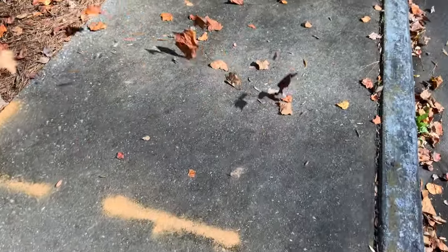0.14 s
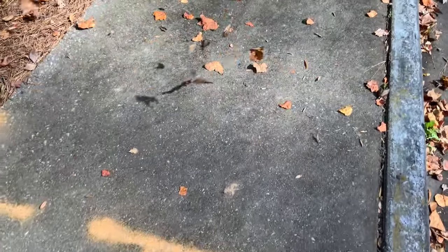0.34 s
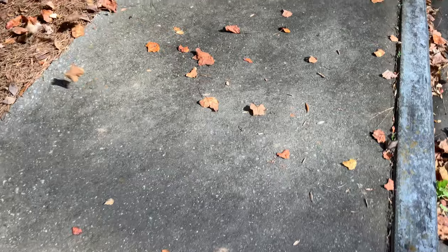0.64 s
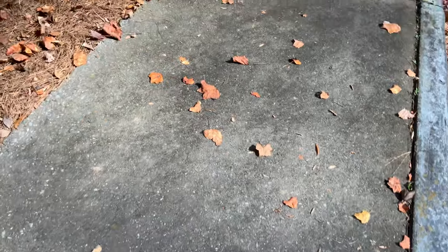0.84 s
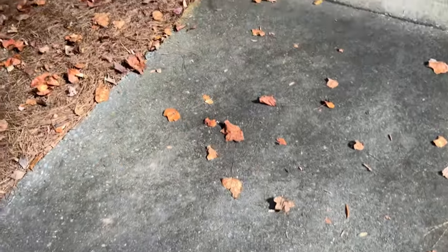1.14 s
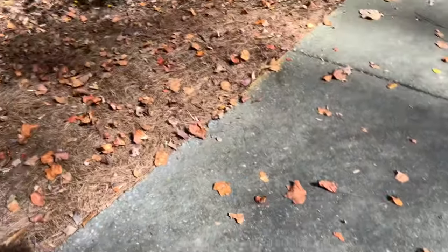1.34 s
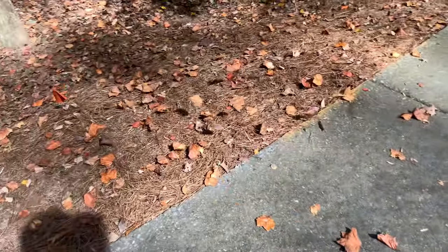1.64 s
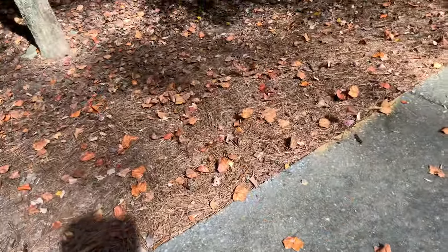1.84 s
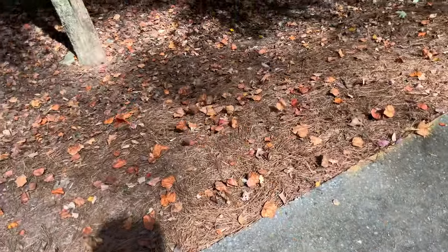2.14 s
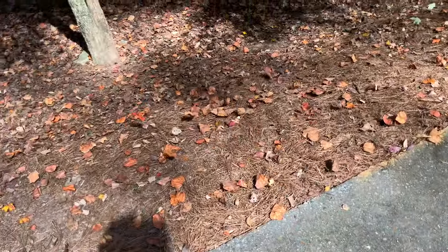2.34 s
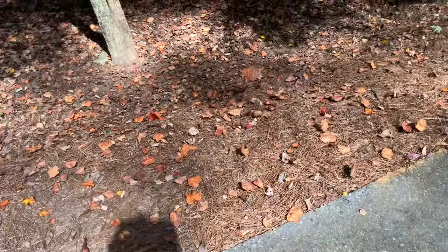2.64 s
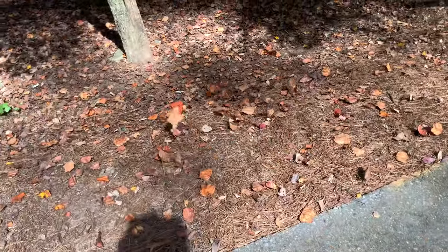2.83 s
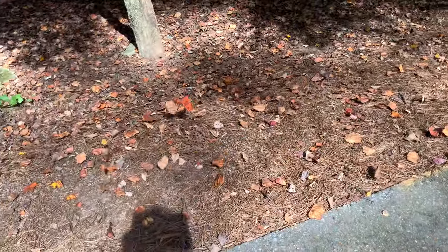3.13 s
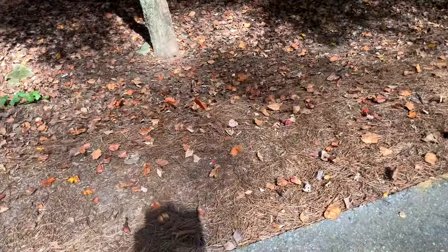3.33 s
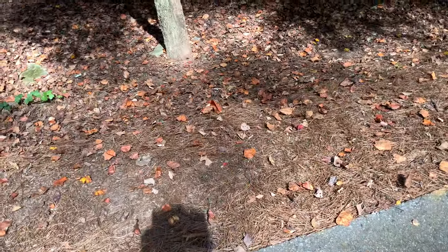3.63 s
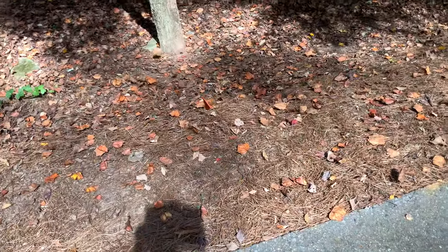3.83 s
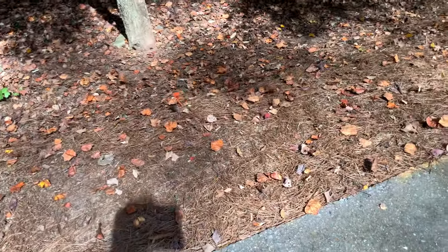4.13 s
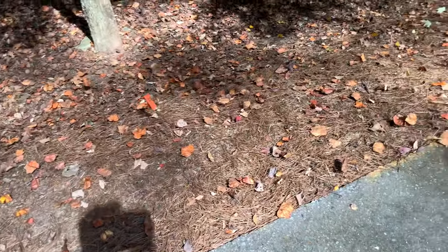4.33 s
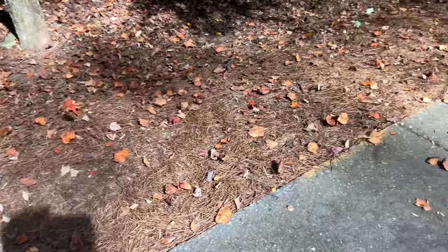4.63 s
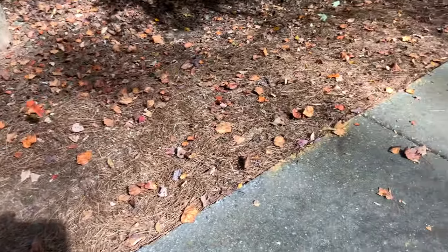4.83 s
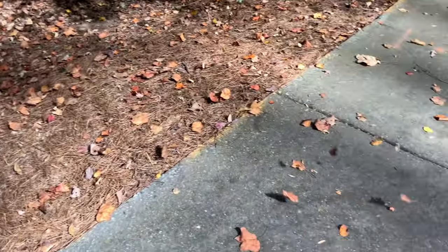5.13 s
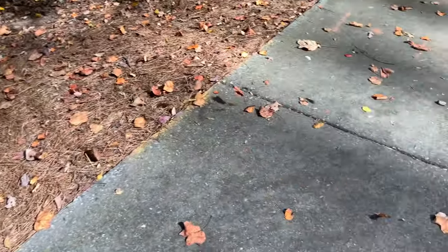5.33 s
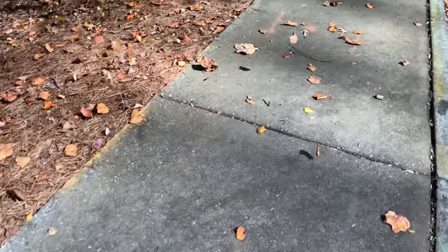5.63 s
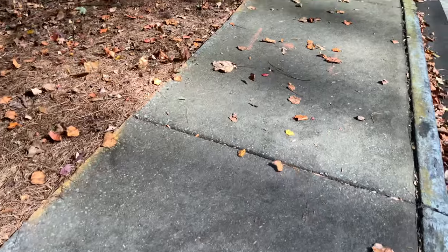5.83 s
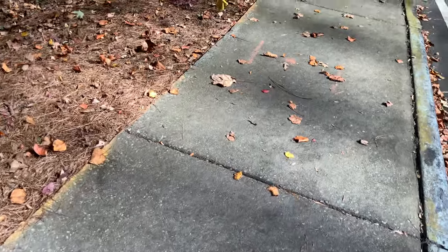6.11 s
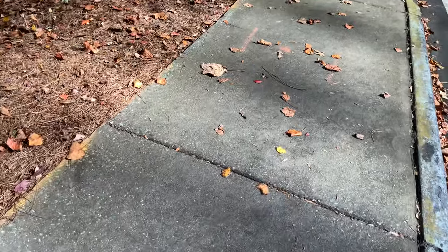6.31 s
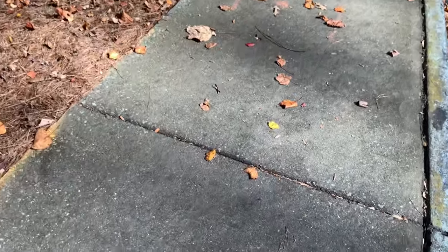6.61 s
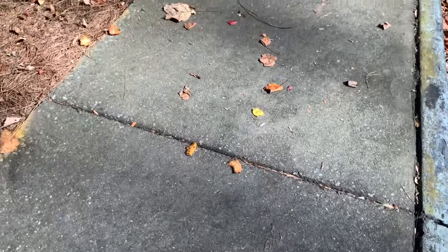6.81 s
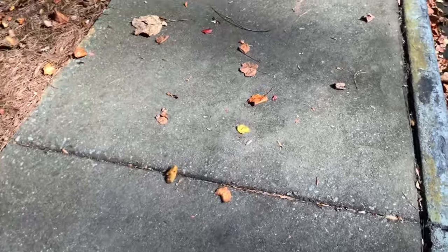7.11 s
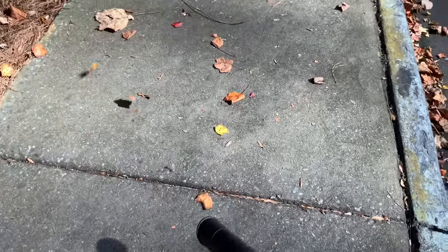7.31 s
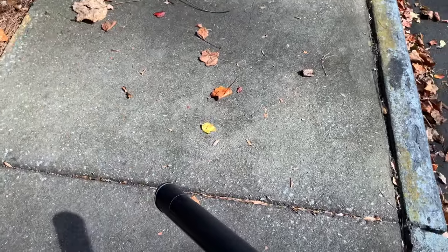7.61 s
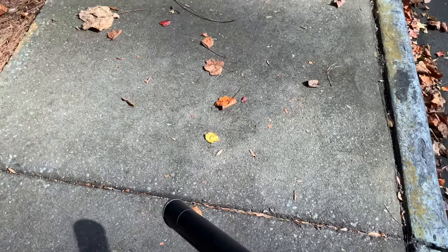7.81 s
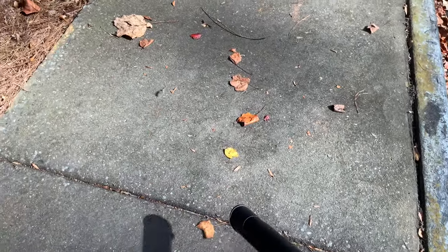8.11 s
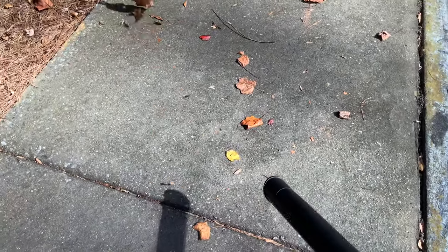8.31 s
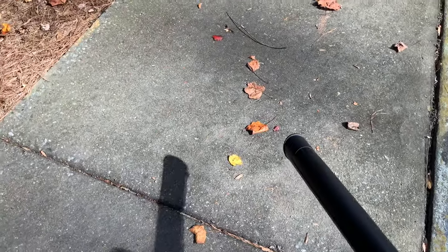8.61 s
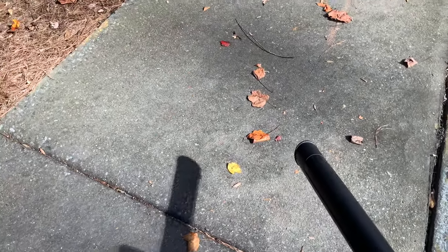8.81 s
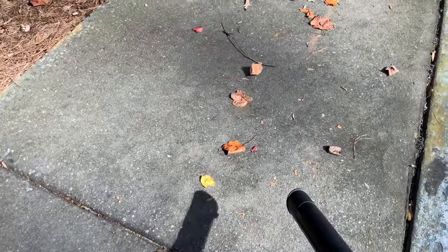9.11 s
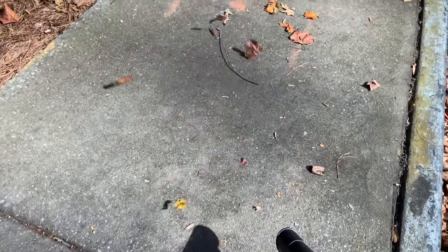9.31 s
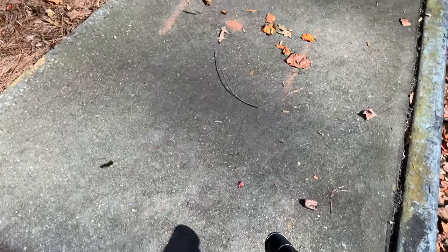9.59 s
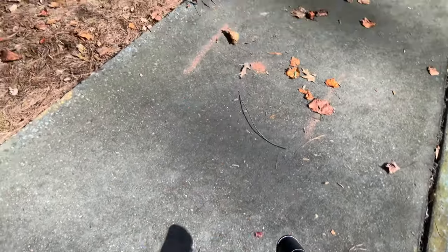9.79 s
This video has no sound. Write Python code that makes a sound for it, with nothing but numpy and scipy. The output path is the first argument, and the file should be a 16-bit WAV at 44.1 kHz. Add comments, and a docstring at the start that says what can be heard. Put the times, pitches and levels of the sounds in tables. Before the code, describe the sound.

Close outdoors, a cordless leaf blower runs at constant full power. A steady electric fan whine, with a low hum and piercing higher tones, sits in a broad rush of air. The sound dulls when the sweep turns aside over pine straw, then brightens as the nozzle pushes forward over pavement. Wind buffets the stereo microphone, hardest near the early turn, and a few leaves and grit tick faintly.

```python
"""Leaf blower swept over a pavement

A cordless blower runs at full power a little way from a two-port microphone. Its nine-blade fan whines on
multiples of the shaft speed; the partials swell and fade as the sweep changes their paths. Air rushes as
noise coloured by intake and tube, gusts buffet the ports, and a few dry leaves tick among grit on concrete."""
import sys
import numpy as np
from scipy import signal
from scipy.fft import rfft, irfft, next_fast_len
from scipy.io import wavfile
from scipy.ndimage import uniform_filter1d

SR = 44100
rng = np.random.default_rng(int(sys.argv[2]) if len(sys.argv) > 2 else 0)


def wav_record(signal):
    """Record a signal, one row per channel, as 16-bit PCM in the file named by sys.argv[1]."""
    frames = np.transpose(np.atleast_2d(signal))
    bounded = np.clip(frames, -1, 1)
    # unit amplitude maps onto the largest positive 16-bit level
    quanta = np.round(bounded * 32767).astype(np.int16)
    wavfile.write(sys.argv[1], SR, quanta)


N = 438794
TIME = np.arange(N) / SR

# Low partials of the fan. Each row: multiple of the shaft speed, level in dB before its swell,
# left-right balance in dB, phase lead of the left port in radians.
PARTIALS = [(1, -31.5, 3.5, -0.51), (2, -47, -4.3, -0.7), (3, -34, 2.5, -2.5), (4, -33.5, 9.5, -2),
            (5, -30, 4.5, 0.02), (6, -27.5, 9.3, 2.5), (7, -36.5, 4.5, 2.5), (8, -41.5, -16, 0),
            (9, -25, 2, -1.1), (10, -41.5, -.7, -0.84), (11, -37, -1.5, -1.5), (12, -38.5, -1, -1.5),
            (13, -40, 4, -3), (14, -37, -2.8, 1.5), (15, -44.5, 8, 0.95), (16, -33.5, 5, -1),
            (17, -35.5, 4, -1.5), (18, -32, 3, -1.5), (19, -39.5, 1, -1.6)]
# The sweep turns aside and back. Each row: time in seconds, 0 along the pavement to 1 over the pine straw.
ASIDE = [(1.15, 0), (1.7, 1), (4.4, 1), (6.1, 0)]
# The blower is pushed forward. Each row: time in seconds, 0 held back to 1 with the nozzle out in front.
FORWARD = [(6.9, 0), (7.7, 1)]
# Treble shared by the top of the buzz and, in part, the rush. Each row: time in seconds, swell in dB.
TREBLE_LEVEL = [(0.0, -1.2), (1.3, -4.3), (1.4, -12), (1.6, -7.5), (2.2, -7.5), (3.9, -4.5), (4.0, -7.5),
                (5.0, -4.5), (5.8, -6.5), (6.5, -6), (7.1, 1.5), (9.95, 1.5)]
# Swells of the shaft hum, three more partials and the blade tone. Each row: time in seconds, swell in dB.
HUM = [(0, -1.5), (1.05, 1), (2, -4.5), (3.2, 1), (4.15, 4), (4.8, -12), (5.55, 2), (6.6, 1.5), (7.8, 6),
       (8.3, 3.5), (8.9, 5.5), (9.3, 3), (9.95, 3.5)]
THIRD = [(0.0, -12), (0.7, -5), (1.0, -17), (2.3, -34), (2.7, 1), (3.8, -13), (4.2, 4.5), (4.7, -7),
         (4.8, -18), (5.4, -10), (5.7, -1), (6.8, -14), (6.9, -2.5), (7.4, -4), (7.8, 2.5), (9.95, 9.5)]
FOURTH = [(0.0, 3.5), (0.7, 3.5), (3.2, -3.5), (3.7, -0.5), (4.1, -7), (4.2, -20), (5.1, -0.5), (5.7, -9.5),
          (6.6, 4), (8.6, 0.3), (8.8, -13), (9.1, 8), (9.95, -8)]
FIFTH = [(0.0, -9.5), (1.2, -7), (1.5, -19), (3.1, 6), (3.5, -8.5), (3.9, -6.5), (4.1, 3), (4.9, -6.5),
         (5.2, 0.7), (5.8, 4), (6.7, -2.7), (7.3, -13.5), (7.5, 0), (8.1, 5), (8.5, -1.5), (9.4, 5),
         (9.7, -4.5), (9.95, 5)]
BLADE_TONE = [(0.0, -9), (0.4, 2), (1.8, -19), (2.0, -6.5), (2.2, -20.5), (3.1, -14.5), (3.3, -14),
              (4.1, -13.5), (5.0, -6.5), (5.1, -17), (5.4, -6), (6.2, -8), (6.7, -5.5), (6.8, 3.8),
              (7.6, 5), (7.8, -2.5), (8.7, 8.5), (9.95, 3.5)]
# the strong tones, by multiple of the shaft speed
LEAD_TONES = {1: HUM, 3: THIRD, 4: FOURTH, 5: FIFTH, 9: BLADE_TONE}


def gain_of(db):
    """Decibels to amplitude."""
    return 10 ** (np.asarray(db) / 20)


def evened(x):
    """Scales to an rms of 1."""
    return x / np.sqrt(np.mean(abs(x) ** 2) + 1e-20)


def read(points, hz):
    """Every column of a table at hz, interpolated on a log axis."""
    f, *columns = np.transpose(points)
    return [np.interp(np.log(hz + 1), np.log(f + 1), c) for c in columns]


def follow(rows, t):
    """Every column of a curve at the times t."""
    s, *columns = np.transpose(rows)
    return [np.interp(t, s, c) for c in columns]


def add(mix, s, sound):
    """Lays a stereo sound into the mix at time s."""
    part = mix[:, round(s * SR):][:, :sound.shape[1]]
    part += sound[:, :part.shape[1]]


def drift(t, rate_hz):
    """Complex chance of rms 1 on the even grid t, changing at up to about rate_hz."""
    f = np.fft.fftfreq(len(t), t[1] - t[0])
    a, b = rng.standard_normal((2, len(t)))
    smooth = np.exp(-.5 * (f / rate_hz) ** 2)
    return evened(np.fft.ifft((a + 1j * b) * smooth))


def noise_pair(spectrum, likeness):
    """Two partly alike noises, with a joint rms of 1 and a given spectrum."""
    left, other = rng.standard_normal((2, N))
    right = likeness * left + np.sqrt(1 - likeness ** 2) * other
    size = next_fast_len(N, True)
    gains = gain_of(read(spectrum, np.fft.rfftfreq(size, 1 / SR))[0])
    shaped = irfft(rfft(np.array([left, right]), size) * gains, size)
    return evened(shaped[:, :N])


def ports(hz):
    """Balance, likeness and phase lead of the left port for sound from the blower."""
    # Each row: frequency in Hz, left-right balance in dB, likeness 0-1, left lead in radians before the lag.
    port_rows = [(200, 1, .6, 1), (480, -1.5, .8, -.1), (650, 0, .8, .4), (830, 3.5, .6, .7),
                 (1000, 3, .3, -1.7), (1300, 4, .35, -1), (1550, 2, .55, 2.3), (2100, 0, .65, 1.1),
                 (2900, 0, .4, 2), (3700, 1.7, .5, .8), (4600, .5, .45, 2.6), (6300, .6, .8, .3),
                 (8400, 1.8, .4, 0), (10000, 0, .8, .1), (15500, 0, .8, -1)]
    lag = 0.0006144  # seconds by which the left port hears the blower later
    balance_db, likeness, lead = read(port_rows, hz)
    return balance_db, likeness, lead - 2 * np.pi * hz * lag


def split(balance_db):
    """Left and right gains that keep the mean power."""
    pair = np.array([gain_of(balance_db / 2), gain_of(-balance_db / 2)])
    return pair / np.sqrt(np.mean(pair ** 2, axis=0))


def swell(k, hz, t):
    """Level change in dB of multiple k as the blower is swept about."""
    # Buzz, the multiples above the low partials. Each row: time in seconds, swell in dB.
    buzz_level = [(0.0, 1), (0.2, -5), (0.5, -0.5), (2.8, -2), (3.3, 1), (3.9, 2.5), (4.5, -4), (4.9, 3.5),
                  (5.0, -2.5), (5.5, 0.6), (6.2, 2.5), (6.4, -1), (6.6, 3), (7.1, -3.5), (8.7, 0.5),
                  (9.95, 0.4)]
    # Low partials that follow the blower's pose. Each row: multiple, dB when turned aside,
    # dB when pushed forward, dB per dB of the buzz swell.
    beaming = [(2, 4.5, -0.5, 0.84), (6, -4.5, -2.5, .1), (7, -0.5, 5, 0.4), (8, -9, 4, 0.6),
               (10, -6.5, 11.5, -1.7), (11, 3.5, 2, -0.1), (12, -0.5, -6, 0.3), (13, 1, 4, -0.6),
               (14, 1.5, 1.5, -0.5), (15, 4.5, 12.5, 0.8), (16, -18, -3.5, 0.2), (17, -19, -8, 0.5),
               (18, -2, 2, 1.34), (19, -4.5, 5, 1.2)]
    # Upper whine, just above the blade tone. Each row: time in seconds, swell in dB.
    upper_whine = [(0, -1.5), (.7, 2.5), (1.5, -4), (2.3, -1.5), (2.9, -6.5), (3.2, 3.5), (3.5, -3),
                   (3.85, 6.5), (4.2, 1), (4.9, -8), (5.6, -4), (6.8, 2.5), (7.2, -.5), (7.55, 6),
                   (8.1, -0.5), (9.2, 3.5), (9.95, -4.5)]
    # The multiples of the shaft speed that make up the upper whine.
    upper_multiples = [11, 12, 13, 14]
    treble_hz = 9600  # the buzz follows the treble from here up

    if k in LEAD_TONES:
        return follow(LEAD_TONES[k], t)[0]
    if k > len(PARTIALS):
        return follow(buzz_level if hz < treble_hz else TREBLE_LEVEL, t)[0]
    aside, forward, buzz_db = (follow(curve, t)[0] for curve in (ASIDE, FORWARD, buzz_level))
    aside_db, forward_db, per_buzz = read(beaming, k)
    upper_db = (k in upper_multiples) * follow(upper_whine, t)[0]
    return aside_db * aside + forward_db * forward + per_buzz * buzz_db + upper_db


def whine():
    """Shaft harmonics; each arrives directly and by shifting reflections, and flutters in the turbulent intake."""
    # Shaft speed before jitter. Each row: time in seconds, turns per second.
    shaft_speed = [(0, 232.1), (1.1, 231.9), (2.1, 232.35), (2.8, 231.65), (3.3, 231.95), (4.1, 231.3),
                   (5.1, 231.95), (5.6, 231.65), (7.5, 231.9), (7.8, 231.5), (8.1, 231.95), (9, 231.55),
                   (9.95, 230.8)]
    # Buzz above the low partials. Each row: frequency in Hz, level of each partial in dB before its swell.
    buzz = [(4600, -41), (5200, -44), (5560, -38), (5900, -44), (6300, -41), (7000, -41), (7300, -47),
            (8200, -43), (9700, -46), (12000, -46.5), (13000, -45), (15500, -48)]
    # Partials whose balance shifts as the blower is pushed forward and whose direction wanders.
    # Each entry: multiple, change of left-right balance in dB.
    leaning = {4: -11.8, 5: -4.1, 6: -6.5}
    # The hum's direction swings with the sweep. Each row: time in seconds, extra left lead in radians.
    hum_lead = [(0, -0.12), (1.2, -0.13), (2.2, -0.52), (4.3, -1.9), (6.7, -1.9), (7.9, -0.27)]
    jitter, jitter_hz = 0.000397, 14  # share of the shaft speed
    # the strong tones are nearly pure: their scatter; also the flutter up to and including the blade tone
    steady = .06
    scatter, low_scatter = 0.96, 0.82  # share reflected: buzz, other low partials
    fade_hz, low_fade_hz = 0.41, 0.56  # before the rise with the multiple
    kinship = 0.41  # likeness of neighbouring partials' echoes
    flutter, flutter_hz = 0.36, 22
    wander_rad, wander_hz = 1.0, 0.24

    t = np.arange(0, N / SR + .01, .004)
    speed, forward = follow(shaft_speed, t)[0], follow(FORWARD, t)[0]
    jittered = np.interp(TIME, t, speed * (1 + jitter * drift(t, jitter_hz).real))
    turn = np.exp(2j * np.pi * np.cumsum(jittered) / SR)
    # neighbouring partials keep a loose step, so each turn of the shaft is one smeared pulse
    phases = np.cumsum(rng.standard_normal(size=68))
    wave, out, echoes = np.ones(N, complex), np.zeros((2, N)), 0
    for k, phase in enumerate(phases, 1):
        wave *= turn
        hz, low, strong = k * speed.mean(), k <= len(PARTIALS), k in LEAD_TONES
        balance_db, likeness, lead = ports(hz)
        db = read(buzz, hz)[0]
        if low:
            _, db, balance_db, lead = PARTIALS[k - 1]

        # long waves pass steadily; short ones are scattered and disturbed
        shortness = min(1, k / 10)
        share = shortness * (steady if strong else low_scatter if low else scatter)
        tremble = np.sqrt(shortness) * (steady if k < 10 else flutter)

        # neighbours fade together, and faster the shorter their waves
        rate_hz = (low_fade_hz if low else fade_hz) * np.sqrt(k)
        fresh = np.array([drift(t, rate_hz) for _ in range(3)])
        echoes = kinship * echoes + np.sqrt(1 - kinship ** 2) * fresh
        # one echo common to both ports, one of each port's own
        reflected = np.sqrt(likeness) * echoes[0] + np.sqrt(1 - likeness) * echoes[1:]
        path = evened(np.sqrt(1 - share ** 2) + share * reflected + tremble * drift(t, flutter_hz))

        path *= gain_of(db + swell(k, hz, t))
        path *= split(balance_db + leaning.get(k, 0) * forward) * np.exp(1j * phase)
        if k == 1:
            lead = lead + follow(hum_lead, t)[0]
        if k in leaning:
            lead = lead + wander_rad * drift(t, wander_hz).real
        path[0] *= np.exp(1j * lead)
        for port in range(2):
            out[port] += (np.interp(TIME, t, path[port]) * wave).real
    return np.sqrt(2) * out


def aim(t, hz):
    """Level change in dB of the rush, times by frequencies, as the blower turns and reaches out."""
    # Each row: frequency in Hz, constant change in dB, dB when turned aside, dB when pushed forward,
    # share of the treble swell.
    rush_beaming = [(700, -1, -0.5, 2.6, 0.097), (1130, 0.76, 0.2, -1.5, 0.36), (2240, 4, -3.5, -0.5, 0.23),
                    (2920, -1.5, -3, 1.7, 0.026), (3870, 2.5, -1.5, -3.5, 0.098),
                    (5130, -0.5, 0.5, 2.7, 0.032), (6450, 0.5, -0.6, 2, 0.036),
                    (9800, -1, -1.9, -3.2, 0.43)]
    db, aside_db, forward_db, treble = read(rush_beaming, hz)
    aside, forward, treble_db = (follow(curve, t)[0][:, None] for curve in (ASIDE, FORWARD, TREBLE_LEVEL))
    return db + aside_db * aside + forward_db * forward + treble * treble_db


def rush():
    """Turbulent air coloured by duct and pose; random patches of it swell and fade."""
    # Rushing air before duct and pose. Each row: frequency in Hz, level in dB per Hz.
    air_spectrum = [(100, -90), (400, -76), (800, -73), (1150, -66.5), (1500, -71), (1850, -73),
                    (2500, -69), (3100, -70.5), (3800, -66), (5400, -71.5), (7400, -70), (8400, -68.5),
                    (10000, -67.5), (15500, -69)]
    # Resonances of tube and intake grille. Each row: frequency in Hz, width in Hz, lift in dB.
    duct = [(600, 130, 9), (2170, 260, 5), (6130, 260, 8), (6630, 300, 8.5)]
    patch_db, flicker_db = 2.5, 1.2  # the whole rush trembles a little, too

    t, hz = np.arange(N // 256 + 5) * 256 / SR, np.fft.rfftfreq(1024, 1 / SR)
    a, b, c, d, patches = rng.standard_normal((5, len(t), len(hz)))
    patches = uniform_filter1d(patches, size=24, axis=0)
    patches = evened(uniform_filter1d(patches, size=8, axis=1))
    duct_db = sum(db / (1 + (2 * (hz - f) / width) ** 2) for f, width, db in duct)
    colour_db = read(air_spectrum, hz)[0] + duct_db
    flicker = flicker_db * drift(t, 14).real[:, None]
    field = gain_of(colour_db + aim(t, hz) + patch_db * patches + flicker)

    balance_db, likeness, lead = ports(hz)
    right = a + 1j * b
    left = (likeness * right + np.sqrt(1 - likeness ** 2) * (c + 1j * d)) * np.exp(1j * lead)
    z = np.array([left, right]) * split(balance_db)[:, None] * field
    air = signal.istft(z.swapaxes(1, 2), nperseg=1024, noverlap=768)[1][:, :N]
    # level per Hz times the whole bandwidth
    return evened(air) * np.sqrt(np.mean(field ** 2) * SR / 2)


def wind():
    """Lumpy low rumble of moving air on the ports."""
    # Wind on the microphone. Each row: time in seconds, level in dB before the lumps.
    wind_level = [(0, -30), (.9, -35.5), (1.2, -36), (1.45, -28), (2, -40.5), (3, -39.5), (3.8, -48),
                  (4.05, -42.5), (4.65, -46.5), (5.2, -37.5), (5.55, -47), (5.78, -28.5), (6.1, -31.5),
                  (6.4, -35), (6.85, -26.5), (7.1, -32.5), (7.6, -36.5), (8.15, -32), (8.6, -38),
                  (9.95, -37.5)]
    # Shape of the rumble. Each row: frequency in Hz, relative level in dB per Hz.
    rumble_spectrum = [(10, -25), (28, 4), (55, 5.5), (120, -4.5), (175, -14), (300, -14.5), (600, -121),
                       (1500, -67)]
    t = TIME[::128]
    lumps = evened(gain_of(4 * drift(t, 10).real))  # 4 dB deep, up to about 10 Hz
    level = gain_of(follow(wind_level, t)[0]) * lumps
    rumble = noise_pair(rumble_spectrum, likeness=.72)
    return np.interp(TIME, t, level) * rumble * split(2.5)[:, None]  # left louder by 2.5 dB


def buffets():
    """Each gust is a short swell of pressure; small eddies pass faster and reach higher."""
    # Gusts that slap the microphone. Each row: middle in seconds, level in dB before halving, reach in Hz.
    gusts = [(0.234, -30.5, 89), (0.29, -20, 133), (1.273, -24, 76), (1.345, -24, 171), (1.382, -20.5, 190),
             (1.412, -17.5, 270), (1.439, -21.5, 263), (1.466, -15.5, 154.6), (1.518, -21, 289),
             (2.09, -28, 146), (3.0, -28, 110), (4.04, -32, 59), (5.716, -27, 108), (5.831, -25, 189),
             (5.866, -25, 91), (5.936, -26, 348), (6.139, -26, 113), (6.169, -18, 85), (6.579, -27, 125),
             (6.902, -29, 81.5), (7.48, -25, 81), (8.157, -22, 140), (8.605, -23, 137)]
    likeness, cycles, shortest = 0.69, 2.6, 0.00638  # shortest: seconds added to each half swell
    out = np.zeros((2, N))
    for s, db, reach_hz in gusts:
        common, *own = rng.standard_normal((3, 8192))
        pressure = np.sqrt(likeness) * common + np.sqrt(1 - likeness) * np.array(own)
        band = signal.butter(2, [reach_hz / 4, reach_hz], "band", fs=SR, output="sos")
        eddy = signal.sosfilt(band, pressure)
        half = shortest + cycles / reach_hz
        rise_and_fall = signal.windows.hann(min(int(2 * half * SR), eddy.shape[1])) ** 2
        # the end of the noise, where the filter has settled
        gust = evened(eddy[:, -len(rise_and_fall):] * rise_and_fall)
        add(out, s - half, gain_of(db) * gust / 2)
    return out


def leaves():
    """A leaf's brittle edge scrapes the concrete in a brief bright crackle; blown grit ticks in between."""
    # Dry leaves hitting the concrete. Each row: start in seconds, level at the start in dB.
    leaf_hits = [(.477, -29), (2.045, -30), (5.206, -31), (7.296, -25.5), (7.544, -27)]
    decay, grit_decay = 0.013, 0.0022  # seconds
    grit_per_s, grit_db = 5, -40  # faintest grit; the rest is louder by chance
    level = sum(gain_of(db) * (TIME >= s) * np.exp(-abs(TIME - s) / decay) for s, db in leaf_hits)
    grit_gain = gain_of(grit_db + 5.3 * np.minimum(rng.exponential(1, N), 3))
    hits = (rng.random(N) < grit_per_s / SR) * grit_gain
    # the tiny offset keeps the decaying filter from underflow
    level = level + signal.lfilter([1], [1, -np.exp(-1 / (grit_decay * SR))], hits + 1e-18)
    # frequency in Hz, relative level in dB
    crackle = [(800, -12), (3000, -31), (8000, -10), (14000, 21), (16000, -12), (18000, -30)]
    return level * noise_pair(crackle, likeness=0.76)


def scene():
    """Blower, wind and leaves at the two ports."""
    return whine() + rush() + wind() + buffets() + leaves()


def record(dry):
    """The recorder's band limit: a steep low-pass."""
    edge_hz = 15800
    low_pass = signal.firwin(511, edge_hz, window=("kaiser", 9), fs=SR)
    return signal.oaconvolve(dry, low_pass[None], "same")


dry = scene()
out = record(dry)
wav_record(out)
```